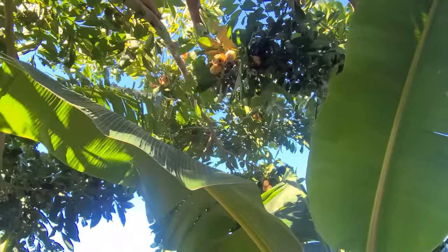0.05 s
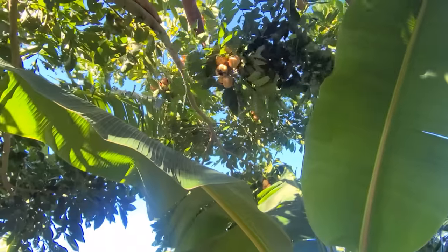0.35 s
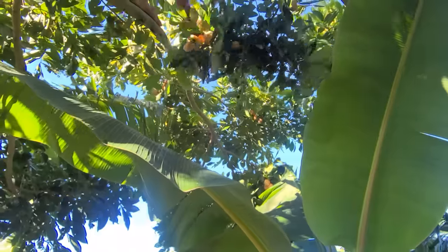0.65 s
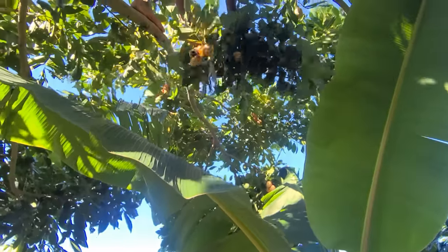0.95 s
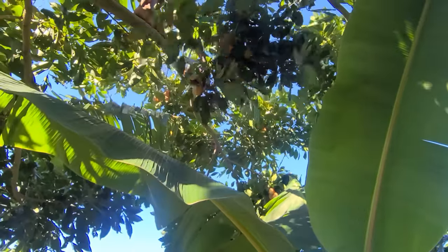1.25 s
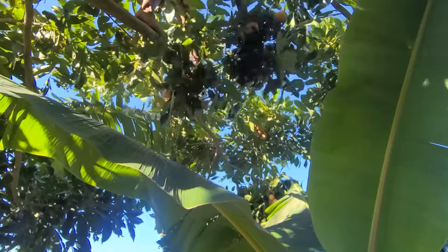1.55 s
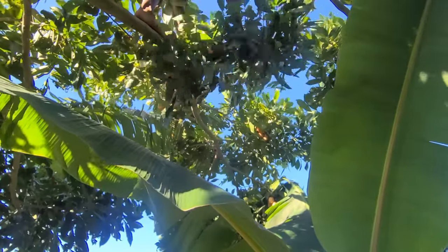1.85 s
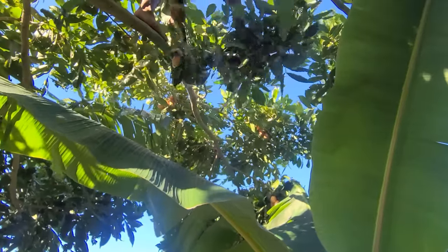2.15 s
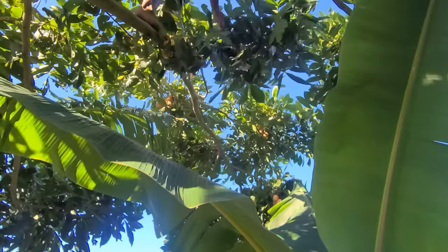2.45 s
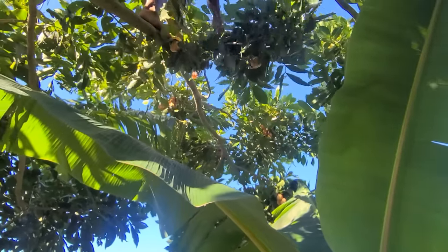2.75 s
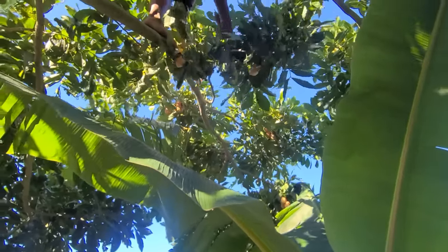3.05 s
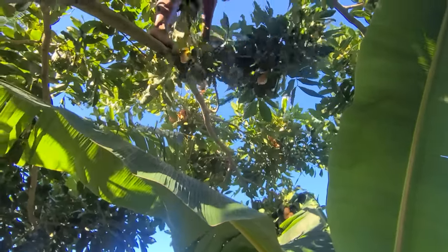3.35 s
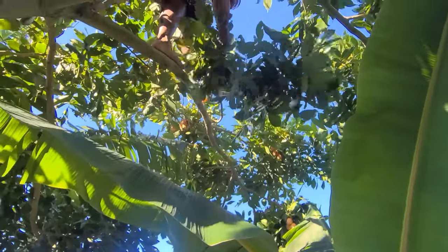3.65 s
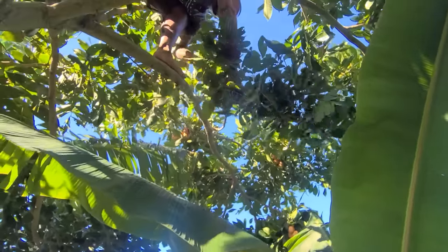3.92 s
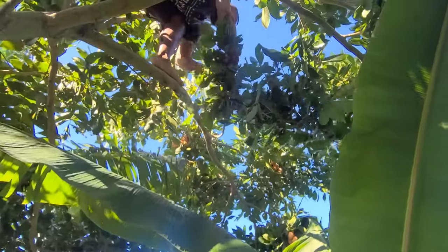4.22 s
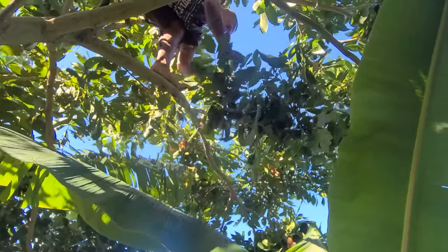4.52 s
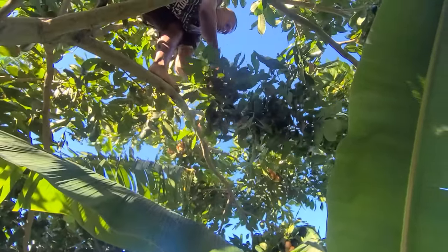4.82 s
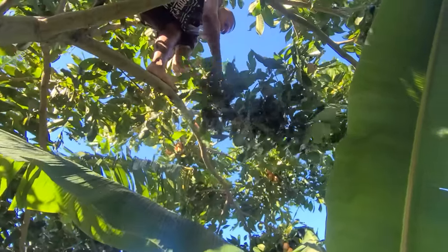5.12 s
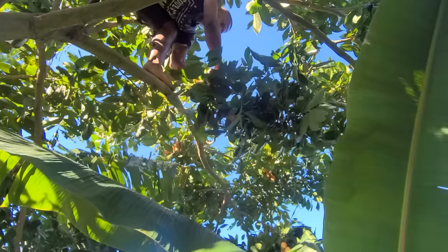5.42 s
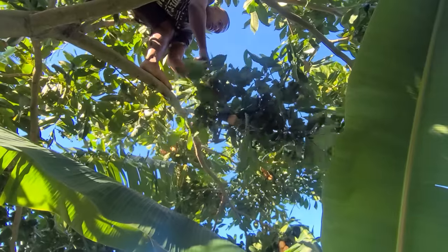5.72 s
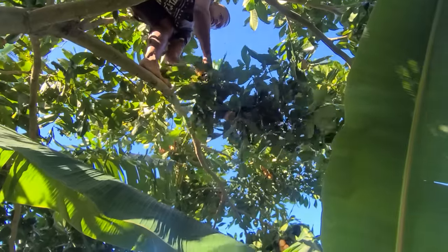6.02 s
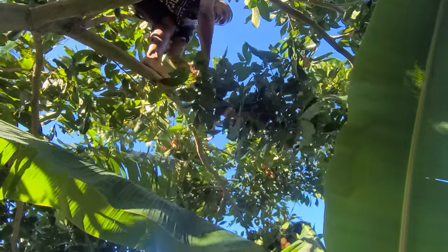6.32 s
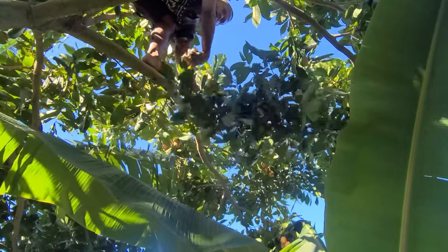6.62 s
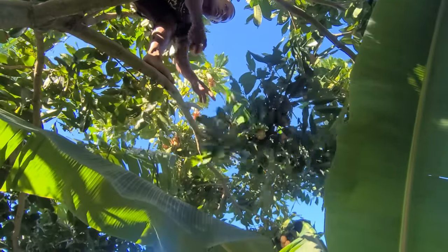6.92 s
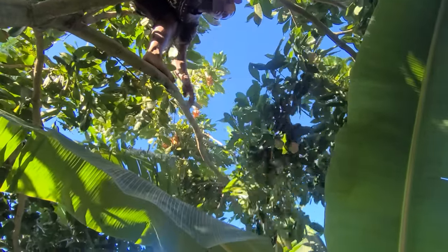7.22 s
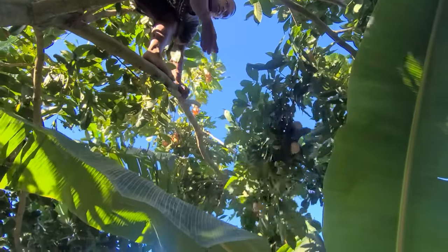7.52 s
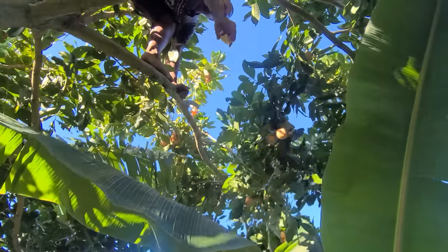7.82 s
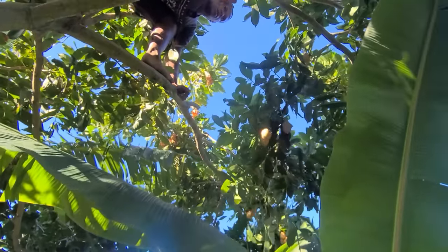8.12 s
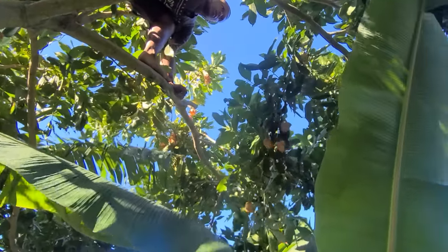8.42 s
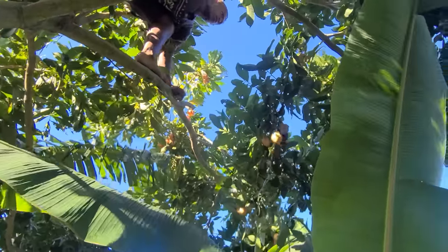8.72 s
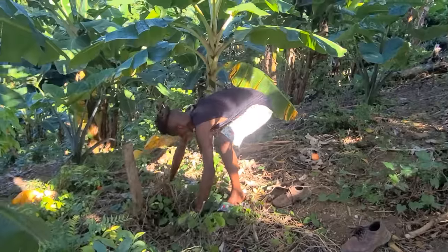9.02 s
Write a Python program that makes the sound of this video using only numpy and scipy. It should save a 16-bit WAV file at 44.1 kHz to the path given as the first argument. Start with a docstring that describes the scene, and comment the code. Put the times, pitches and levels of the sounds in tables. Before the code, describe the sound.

A few metres below a fruit tree, stiff leaves rustle in uneven bursts as someone climbs along a bough and drags its branches about. Twigs crackle and snap sharply, sprays of leaves swish past, and the wood takes dull knocks. A small bird gives thin, high calls now and then over a low outdoor hush. The shaking eases late on, and feet briefly shuffle in dead leaves at the end.

```python
"""Under a fruit tree, a few metres below someone who climbs along a bough and drags its branches about.
Friction and many small impacts make the stiff leaves rustle and the sprays swish; twigs fracture and
ring, and the damped bough takes dull knocks. A small bird calls thinly now and then over a low outdoor
hush; at the end feet shuffle in leaf litter. Both channels carry the same sound."""
import sys
import numpy as np
from scipy import signal
from scipy.fft import rfft, irfft, next_fast_len
from scipy.io import wavfile
from scipy.ndimage import uniform_filter1d

SR = 44100
rng = np.random.default_rng(int(sys.argv[2]) if len(sys.argv) > 2 else 0)


def master(y):
    """Save y as 16-bit WAV."""
    cut = np.clip(np.atleast_2d(y).T, -1, 1)
    pcm = np.round(cut * 32767)  # scale
    wavfile.write(sys.argv[1], SR, pcm.astype(np.int16))


N = 408807
TIME = np.arange(N) / SR

# Spectral densities (f/Hz, relative level/dB) of:
HUSH_SPECTRUM = [(15, -49.5), (25, -42), (78, -4), (108, 3), (236, 1.5), (285, 1), (335, 0), (545, -7),
                 (1190, -10.5), (1330, -10), (2350, -16), (3430, -10.5), (8140, -18), (14400, -37),
                 (16000, -71)]   # the open air
LITTER_SPECTRUM = [(90, -9), (200, -2), (450, -3), (750, -1), (1600, -6), (2400, -11), (4500, -3),
                   (8000, -9), (14000, -31)]   # crushed dead leaves
SWISH_SPECTRUM = [(300, -5.5), (620, -3), (900, -17), (1300, -2.5), (1850, -1.5), (2300, -5.5), (3100, -1),
                  (5000, 2), (7500, -1), (10000, -7), (15000, -20)]   # a spray brushing past
CRACK_SPECTRUM = [(150, -21), (600, -6), (1000, -16), (1600, -3), (3000, 1), (5000, 0.5), (8000, -3),
                  (11000, -11.5), (16000, -35)]   # breaking wood
LEAF_SPECTRUM = [(470, -29), (800, -36), (918, -17), (1110, -12), (1460, -6.5), (2240, -9), (2660, -3),
                 (4030, -1), (4510, -1), (6570, -2), (8440, -7), (13300, -19.5), (15000, -28), (16000, -19)]   # rustling leaves
SPRAY_SPECTRUM = [(45, -20.5), (100, -8), (180, -4), (320, 0), (450, -1), (650, 0.5), (780, -4.5),
                  (930, -15.5), (1200, -8.5), (1600, -4.5), (2200, -6), (3500, -36.5)]   # flapping sprays
# Response of the struck bough: f/f0, relative level/dB
BOUGH_RESPONSE = [(.3, -37), (.75, -13), (1.1, -0.5), (2.4, -7.5), (4.5, -14.5), (12, -15)]
# Course of the outdoor hush: t/s, level/dB
HUSH_LEVELS = [(0, -39.5), (.7, -43), (1.2, -39), (2.6, -41), (4.5, -38), (5.6, -37), (6.5, -36),
               (7.6, -40), (8.3, -39), (9.27, -35.5)]
# Bird calls: t/s, level/dB, final f/Hz
BIRD_CALLS = [(0.053, -32, 8000), (2.416, -28.5, 8020), (3.815, -30.5, 8150), (4.68, -26, 7940),
              (6.445, -29.5, 7750), (8.455, -29, 7990)]
# Feet in leaf litter: t/s, level/dB, duration/s
FOOT_SHUFFLES = [(8.959, -27, 0.077), (9.112, -30.5, 0.13)]
# Stalk rubbing on stalk: t/s, level/dB, f/Hz, duration/s
STALK_RUBS = [(0.034, -31, 3020, 0.062), (0.16, -31, 3970, 0.026), (0.70, -33, 3100, 0.025),
              (0.773, -27, 3830, 0.083), (1.992, -17, 2850, 0.04), (3.082, -26, 3150, 0.016),
              (7.696, -28, 2990, 0.063)]
# Knocks on the bough: t/s, peak level/dB, T60/s, pitch of the wood f0/Hz
BOUGH_KNOCKS = [(0.683, -22, .03, 420), (1.031, -12.5, 0.077, 200), (1.558, -10, 0.15, 246),
                (1.851, -16, 0.19, 150), (2.30, -17.5, 0.093, 600), (2.762, -13, 0.016, 400),
                (3.028, -14.5, 0.057, 320), (4.307, -8.5, .03, 500), (5.524, -9, 0.045, 288),
                (5.552, -17.5, 0.35, 241), (6.3, -17, 0.053, 395), (6.649, -22, 0.21, 182),
                (6.722, -17, .02, 600), (7.824, -20, .06, 500), (9.014, -18, 0.035, 350)]
# Sprays sweeping through leaves: t/s at the crest, level/dB, rise/s, fall/s, tilt/(dB per octave)
SPRAY_SWISHES = [(0.914, -15.5, 0.024, 0.027, 0.5), (2.755, -18, 0.015, 0.01, 0.5),
                 (4.229, -15.5, 0.0078, 0.0123, -0.5), (4.429, -17, .015, 0.04, 1),
                 (5.55, -21, 0.015, 0.031, 0), (5.585, -20, 0.011, 0.017, -2.5),
                 (6.665, -16.5, 0.0069, 0.084, -2), (7.831, -15.5, 0.006, 0.021, 0),
                 (8.138, -24.5, .012, 0.033, 1), (8.675, -10.5, 0.0098, 0.033, 1.5)]
# Loud twig fractures: t/s, initial level/dB, f/Hz, T60/s
TWIG_SNAPS = [(0.113, -17, 5800, 0.046), (0.4921, -16.5, 5760, 0.016), (0.5693, -21.5, 6630, .046),
              (0.5814, -18.5, 6200, 0.029), (0.6298, -10.5, 6000, .022), (0.7447, -16, 3250, 0.021),
              (1.259, -11.5, 4040, 0.073), (1.5476, -6.5, 6000, 0.017), (1.8158, -9, 4310, .018),
              (1.8425, -6, 6930, .011), (2.2957, -12.5, 5200, 0.03), (2.6025, -10, 4400, .011),
              (2.6444, -11.5, 4740, 0.032), (2.7996, -6.5, 4890, 0.0303), (3.025, -5, 5000, 0.01),
              (3.0415, -7.5, 3320, 0.017), (3.1972, -11, 4140, 0.042), (3.2181, -11, 3730, 0.028),
              (3.4974, -12.5, 6060, 0.0263), (4.18, -8.5, 5570, 0.01), (4.2098, -14, 6120, .045),
              (4.2338, -7.5, 6200, .021), (4.3066, -7.5, 2450, 0.017), (4.4194, -11.5, 3750, 0.035),
              (5.096, -12.5, 4180, 0.011), (5.2052, -16, 6600, 0.035), (5.3408, -10.5, 2880, 0.012),
              (5.3534, -15, 5320, 0.023), (5.5252, -4, 1870, 0.0185), (5.5942, -12, 5510, .015),
              (5.9643, -15.5, 5400, 0.011), (6.0062, -12, 5400, .015), (6.0736, -18, 3360, 0.0243),
              (6.2996, -20.5, 4350, 0.022), (6.3824, -13.5, 4900, .016), (6.3973, -9.5, 5300, 0.012),
              (6.4054, -15.5, 4050, .034), (6.6478, -4.5, 4300, .018), (6.6583, -8, 3340, 0.021),
              (6.7221, -12.5, 4600, 0.013), (6.8409, -12.5, 4220, .017), (6.981, -8, 3240, 0.013),
              (7.8226, -14.5, 2563, 0.047), (8.976, -19, 1680, 0.035), (9.2145, -18, 3660, 0.0178)]
# Tugs on the branches: t/s, duration/s, level/dB of the shaking
BRANCH_TUGS = [(-0.06, 0.227, -35), (0.211, 0.024, -32), (0.52, 0.24, -36), (0.75, 0.32, -27),
               (0.98, .32, -16.5), (1.32, 0.17, -22), (1.501, 0.29, -20), (1.76, 0.2, -17),
               (2.11, 0.18, -23.5), (2.37, 0.11, -27), (2.51, .06, -24.5), (2.64, .24, -22.5),
               (2.91, 0.13, -23.5), (3.14, 0.065, -25.5), (3.25, .36, -23), (3.6, 0.24, -19),
               (4.06, 0.08, -24), (4.21, .39, -22.5), (4.85, .04, -33.5), (4.98, .17, -28),
               (5.53, 0.17, -25), (5.949, 0.03, -27), (6.11, 0.061, -33), (6.31, 0.069, -30),
               (6.54, 0.056, -30), (6.68, .32, -25.5), (7.02, .29, -25), (7.4, .1, -33),
               (7.63, 0.208, -33.5), (7.81, .29, -32), (8.27, 0.041, -37.5), (8.49, .33, -39.5),
               (8.91, .36, -34)]


def from_db(db):
    """Amplitude ratio of a level in decibels."""
    return 10 ** (np.asarray(db) / 20)


def unit_rms(x):
    """Normalisation to unit mean power."""
    return x / np.sqrt(np.mean(x ** 2) + 1e-20)


def level_at(spectrum, hz):
    """Interpolation of a spectrum on a logarithmic frequency axis."""
    f, db = np.transpose(spectrum)
    return np.interp(np.log(hz + 1e-6), np.log(f), db)


def colour(x, spectrum):
    """Minimum-phase filtering, falling away beyond the ends of the spectrum."""
    size = 2 * next_fast_len(len(x) // 2 + 2048)
    hz = np.maximum(np.fft.rfftfreq(size, 1 / SR), 1)
    skirts = (1 + (spectrum[0][0] / hz / 2) ** 2) * (1 + (hz / spectrum[-1][0] / 2) ** 2)
    cepstrum = irfft(np.log(from_db(level_at(spectrum, hz)) / skirts))
    cepstrum[1:size // 2] *= 2   # folding the cepstrum makes the response causal
    cepstrum[size // 2 + 1:] = 0
    return irfft(rfft(x, size) * np.exp(rfft(cepstrum)))[:len(x)]


def band(x, low_hz, high_hz):
    """Band-pass filtering."""
    return signal.sosfilt(signal.butter(2, [low_hz, high_hz], "band", fs=SR, output="sos"), x)


def resonate(x, hz, q):
    """Forced response of a damped oscillator, with unit gain at resonance."""
    return signal.lfilter(*signal.iirpeak(min(hz, SR / 3), max(q, 1), fs=SR), x)


def arch(length_s):
    """Half-sine envelope."""
    return np.sin(np.linspace(0, np.pi, int(length_s * SR)))


def add(track, s, sound):
    """Superposition of a sound on a track, from time s."""
    start = int(np.clip(s * SR, 0, N - 1))
    track[start:start + len(sound)] += sound[:N - start]


def ticks(per_s, spread_db):
    """A random point process: impulses of either sign and unequal strength."""
    at = np.flatnonzero(rng.random(N) < per_s / SR)
    signs = rng.choice([-1, 1], len(at))
    out = np.zeros(N)
    out[at] = signs * from_db(spread_db * np.minimum(rng.exponential(1, len(at)), np.e))
    return out


def contacts(per_s, spread_db, fade_s):
    """Shot noise: the power of random touches, each decaying exponentially; mean 1."""
    at = np.flatnonzero(rng.random(N) < per_s / SR)
    power = np.zeros(N)
    power[at] = from_db(spread_db * np.minimum(rng.exponential(1, len(at)), np.pi)) ** 2
    power = signal.lfilter([1], [1, -np.exp(-1 / (fade_s * SR))], power + 1e-18)
    return power / power.mean()


def canopy(x, t60, wet_db):
    """Scattering by trunks and foliage adds a short diffuse tail."""
    t = np.arange(SR // 2) / SR
    echoes = rng.standard_normal(len(t)) * from_db(-60 * t / t60) * (1 - np.exp(-t / 0.0021))
    return x + from_db(wet_db) * signal.fftconvolve(x, echoes / np.linalg.norm(echoes))[:N]


def hush():
    """Ambient noise of the open air: a low, continuous spectrum whose level drifts."""
    level_db = np.interp(TIME, *np.transpose(HUSH_LEVELS))
    return from_db(level_db) * unit_rms(colour(rng.standard_normal(N), HUSH_SPECTRUM))


def bird(length_s, drop_hz, glide_s, waver_hz):
    """Frequency modulation: a thin 'tsip' glides down and levels off, hoarse with random waver."""
    out, t = np.zeros(N), np.arange(int(length_s * SR)) / SR
    for s, db, hz in BIRD_CALLS:
        waver = waver_hz * unit_rms(uniform_filter1d(rng.standard_normal(len(t)), size=50))
        phase = 2 * np.pi * np.cumsum(hz + waver + drop_hz * np.exp(-t / glide_s)) / SR
        add(out, s, from_db(db) * np.sqrt(np.sin(np.pi * t / length_s)) * np.sin(phase))
    return out


def shuffles():
    """Crushing: dead leaves give way underfoot in random bursts that sum to a dull crunch."""
    weight = np.zeros(N)
    for s, db, length in FOOT_SHUFFLES:
        add(weight, s, from_db(db) * np.sqrt(np.abs(arch(length))))
    crunch = np.sqrt(contacts(per_s=300, spread_db=5.0, fade_s=0.0038)) * rng.standard_normal(N)
    return weight * unit_rms(colour(crunch, LITTER_SPECTRUM))


def rubs():
    """Stick-slip friction: uneven slips of stalk on stalk sustain one hoarse resonance."""
    out = np.zeros(N)
    for s, db, hz, length in STALK_RUBS:
        stroke = arch(length)
        squeak = band(rng.standard_normal(len(stroke)), hz / 1.14, hz * 1.18)
        add(out, s, from_db(db) * stroke * unit_rms(squeak))
    return out


def knocks():
    """Heavy damping: green wood and hanging fruit answer a blow with a dull thud."""
    out, t = np.zeros(N), np.arange(SR // 3) / SR
    for s, db, t60, hz in BOUGH_KNOCKS:
        blow = rng.standard_normal(len(t)) * from_db(-60 * t / t60)
        thud = colour(blow, [(hz * ratio, level) for ratio, level in BOUGH_RESPONSE])
        add(out, s, from_db(db) * thud / np.abs(thud).max())
    return out


def swishes():
    """Sliding friction: grainy noise swells as a spray speeds through the leaves, then settles."""
    out, t = np.zeros(N), np.arange(SR // 2) / SR
    for s, db, rise, fall, tilt_db in SPRAY_SWISHES:
        lead = np.e * rise
        swell = np.where(t < lead, np.exp(-.5 * ((t - lead) / rise) ** 2), np.exp(-abs(t - lead) / fall))
        grain = np.sqrt(0.5 + 1.2 * contacts(per_s=610, spread_db=0.5, fade_s=0.00227)[:len(t)])
        spectrum = [(hz, level + tilt_db * np.log2(hz)) for hz, level in SWISH_SPECTRUM]
        brushing = colour(grain * rng.standard_normal(len(t)), spectrum)
        add(out, s - lead, from_db(db) * swell * unit_rms(brushing))
    return out


def crackle(click_db, ping_db, q):
    """Impulse excitation: leaf edges click, and small stalks ring at their natural frequencies."""
    clicks = colour(ticks(per_s=70, spread_db=4.0), CRACK_SPECTRUM)
    pitches = np.geomspace(1400, 6000, 36)
    taps = ticks(per_s=130, spread_db=-1.5)
    stalk = rng.integers(0, len(pitches), N)
    pings = sum(from_db(level_at(LEAF_SPECTRUM, hz)) * resonate(taps * (stalk == k) + 1e-18, hz, q)
                for k, hz in enumerate(pitches))
    return from_db(click_db) * unit_rms(clicks) + from_db(ping_db) * unit_rms(pings)


def snap(hz, t60, crack_db, q):
    """Fracture: a sharp break and a volley of tearing fibres ring the twig; initial rms near 1."""
    t = np.arange(SR // 10) / SR
    fibres = rng.standard_normal(len(t))
    fibres *= from_db(2.0 * rng.standard_normal(len(t)) - 60 * t / max(t60, .003))
    fibres *= 1 - np.exp(-t / 0.00027)
    force = fibres / np.linalg.norm(fibres) + 0.19 * (t == 0)
    # thin, high twigs give mostly crack and little bass; thick ones ring more clearly
    thinness = np.log2(hz / 4000)
    crack = colour(force, [(f, db + 4.3 * thinness * np.log2(min(f, 7000))) for f, db in CRACK_SPECTRUM])
    sound = unit_rms(resonate(force, hz, q)) + from_db(crack_db + 1.7 * thinness) * unit_rms(crack)
    return sound / np.linalg.norm(sound) * np.sqrt(t60 * SR / np.log(1e6))


def twigs(shake_db, per_s, above_db, median_hz, spread_octaves, lesser_t60):
    """Fracture under load: the loud snaps, and lesser random ones whose level follows the shaking."""
    out = np.zeros(N)
    at = np.flatnonzero(rng.random(N) < per_s / SR)
    pitches = median_hz * 2 ** (spread_octaves * rng.standard_normal(len(at)))
    lesser = [(i / SR, shake_db[i] + above_db, hz, lesser_t60) for i, hz in zip(at, pitches)]
    for s, db, hz, t60 in list(TWIG_SNAPS) + lesser:
        add(out, s, from_db(db) * snap(hz, t60, crack_db=1.0, q=12.0))
    return out


def shaking(fade_s, attack_s=0.016, release_s=0.017, sway_db=-1.5):
    """Forced motion, then free decay, in dB: each tug leaves the branch swaying; the strongest leads."""
    motion, t = 0, TIME[::40]
    sway = from_db(sway_db)
    for s, length, db in BRANCH_TUGS:
        pulled, freed = np.maximum(t - s, 0), np.maximum(t - s - length, 0)
        release = (1 - sway) * np.exp(-freed / release_s) + sway * np.exp(-freed / fade_s)
        motion = np.maximum(motion, from_db(db) * (1 - np.exp(-pulled / attack_s)) * release)
    return np.interp(TIME, t, 20 * np.log10(motion + 1e-3))


def flapping(shake_db, lag_s, below_db, rest_db):
    """Delayed response: the amplitude of heavy sprays trails the shaking and never quite dies."""
    driven_db = np.interp(TIME - lag_s, TIME, shake_db) - below_db
    return np.hypot(from_db(driven_db), from_db(rest_db))


def rustle(spectrum, clumps, rub_db, clump_db, tap_db, tap_s):
    """Incoherent sources add in power: smooth rubbing, broadband clumps and narrow-band leaf taps."""
    edges = np.geomspace(50, 17000, 25)
    white, out = rng.standard_normal((2, N)), 0
    for k, (low, high) in enumerate(zip(edges, edges[1:])):
        ring_s = tap_s * np.sqrt(3000 / low)   # big leaves ring longer
        taps = contacts(per_s=180, spread_db=1.5, fade_s=ring_s)
        power = from_db(rub_db) ** 2 + from_db(clump_db) ** 2 * clumps + from_db(tap_db) ** 2 * taps
        out = out + np.sqrt(power) * band(white[k % 2], low, high)
    return unit_rms(colour(out, spectrum))


def foliage(shake_db, sizzle_hz, sizzle_fade_s):
    """Common excitation: the same collisions make light leaves hiss and heavy sprays flap."""
    clumps = contacts(per_s=330, spread_db=6.0, fade_s=0.0045)
    leaves = rustle(LEAF_SPECTRUM, clumps, rub_db=-3.5, clump_db=0, tap_db=0, tap_s=0.006)
    sprays = rustle(SPRAY_SPECTRUM, clumps, rub_db=-3.5, clump_db=-0.5, tap_db=-2, tap_s=0.004)
    # the bright scrape of leaf on leaf stops sooner than the sway
    sizzle = signal.sosfiltfilt(signal.butter(2, sizzle_hz, "high", fs=SR, output="sos"), leaves)
    return (from_db(shake_db - 0.5) * (leaves - sizzle)
            + from_db(shaking(sizzle_fade_s) - 0.55) * sizzle
            + flapping(shake_db, lag_s=0.023, below_db=11, rest_db=-44.5) * sprays)


def scene():
    """Superposition at one point of the hush, the bird, the ground and the tree."""
    shake_db = shaking(fade_s=0.24)
    wood = twigs(shake_db, per_s=5.6, above_db=8, median_hz=5740, spread_octaves=0.76, lesser_t60=0.0099)
    # clicks grow more slowly than the rustle, so they stand out in the lulls
    wood += from_db(0.77 * shake_db) * crackle(click_db=-18.0, ping_db=-14.0, q=26.0)
    wood += knocks() + rubs()
    calls = bird(length_s=0.043, drop_hz=1000, glide_s=0.0056, waver_hz=130)
    background = canopy(calls, t60=0.2, wet_db=-6) + hush()
    leaves = foliage(shake_db, sizzle_hz=7550, sizzle_fade_s=0.18)
    branches = canopy(wood + swishes(), t60=0.07, wet_db=-12)
    mono = background + shuffles() + branches + leaves
    return np.array([mono, mono])


def record(dry):
    """Clipping limits the highest peaks; a steep low-pass filter cuts the top."""
    top_cut = signal.ellip(12, .1, 80, 15700, fs=SR, output="sos")
    return signal.sosfilt(top_cut, np.clip(dry, -1, 1))


dry = scene()
out = record(dry)
master(out)
```